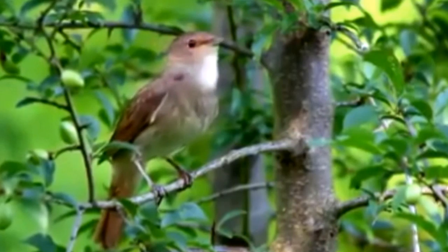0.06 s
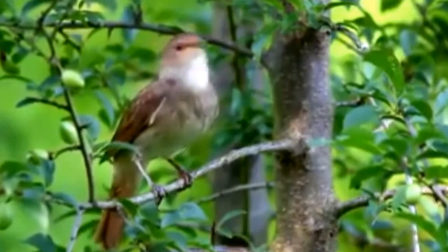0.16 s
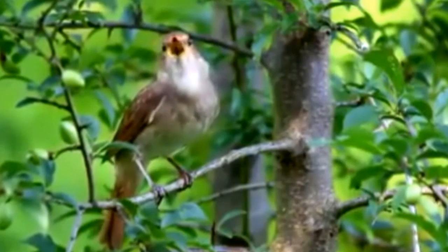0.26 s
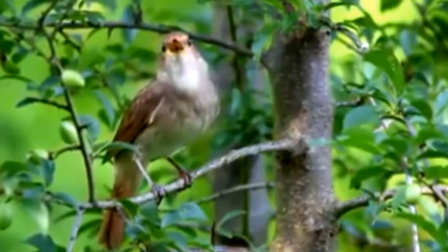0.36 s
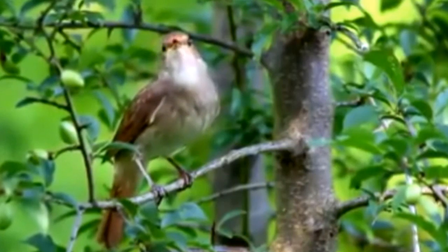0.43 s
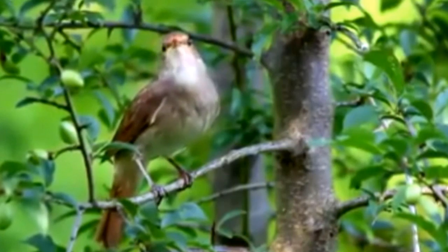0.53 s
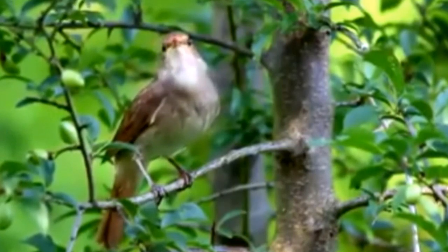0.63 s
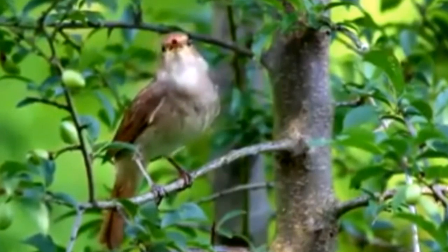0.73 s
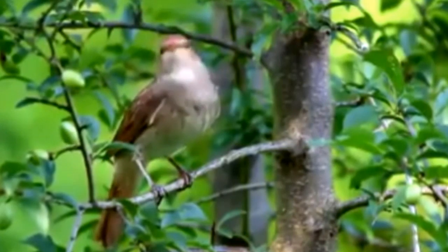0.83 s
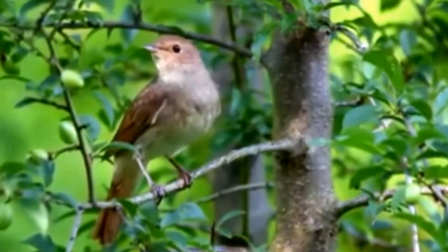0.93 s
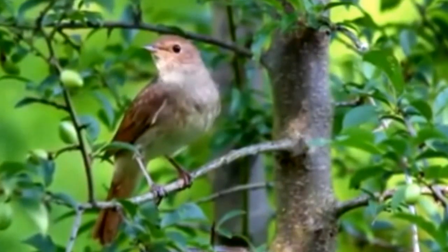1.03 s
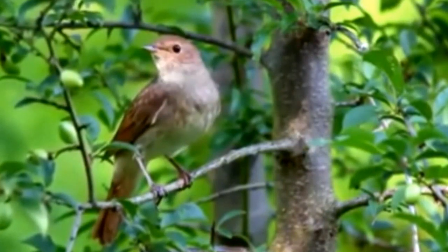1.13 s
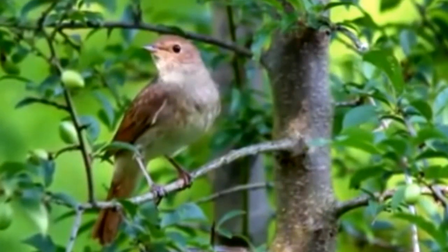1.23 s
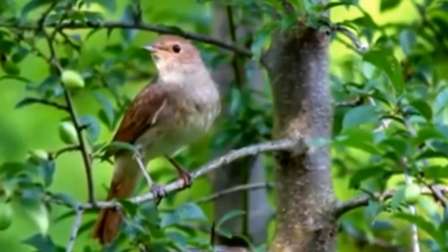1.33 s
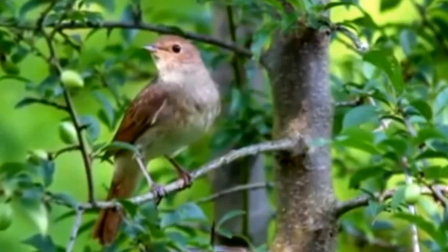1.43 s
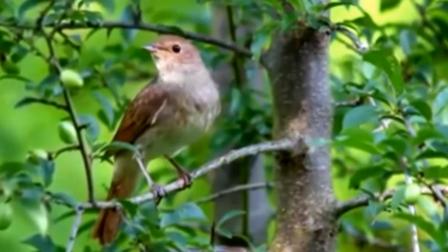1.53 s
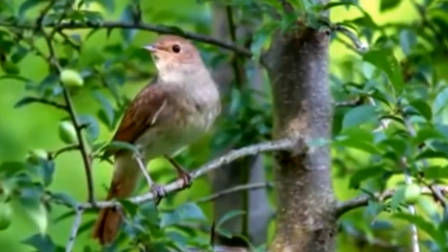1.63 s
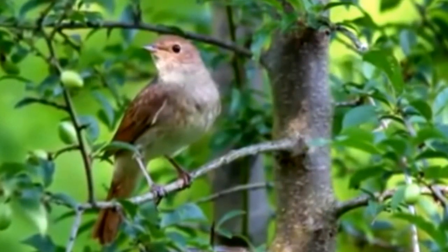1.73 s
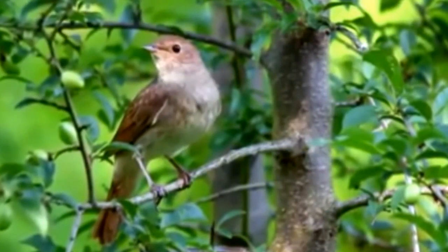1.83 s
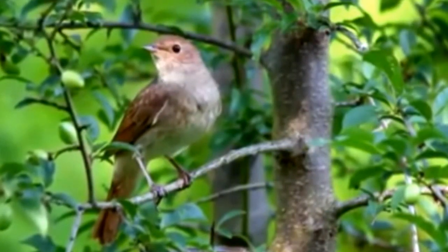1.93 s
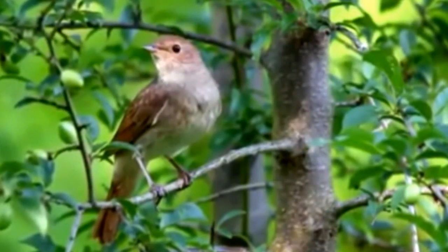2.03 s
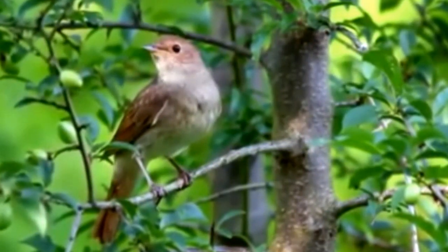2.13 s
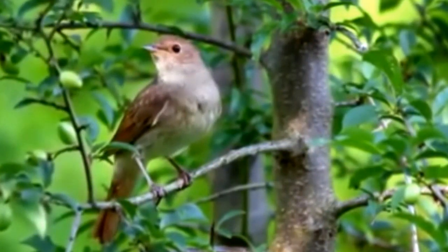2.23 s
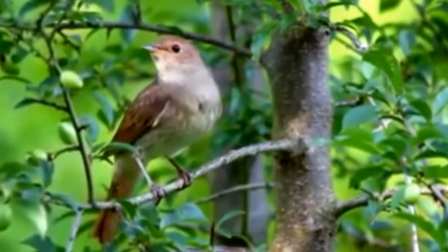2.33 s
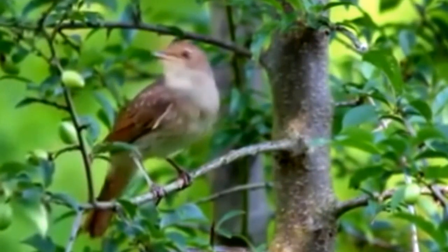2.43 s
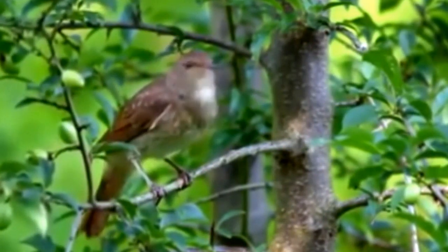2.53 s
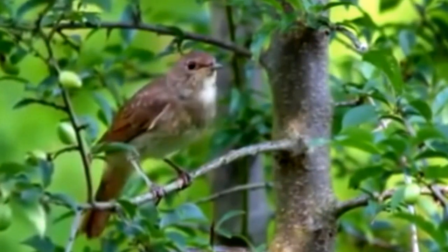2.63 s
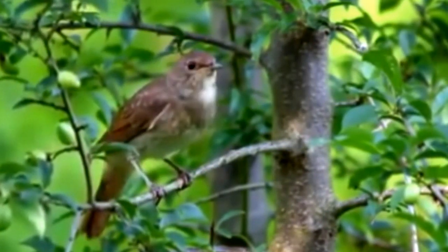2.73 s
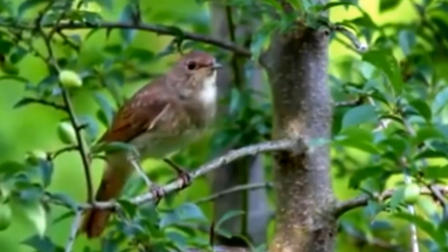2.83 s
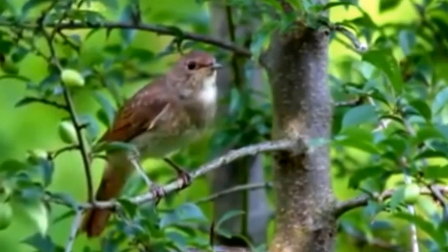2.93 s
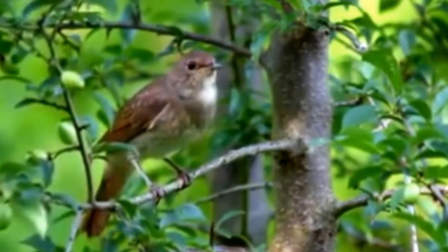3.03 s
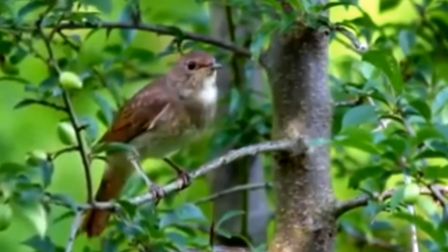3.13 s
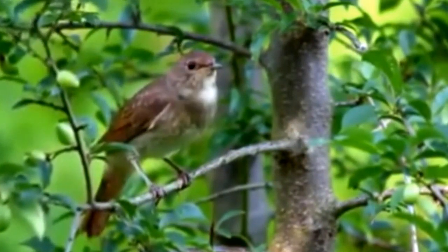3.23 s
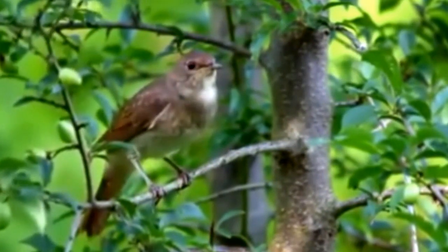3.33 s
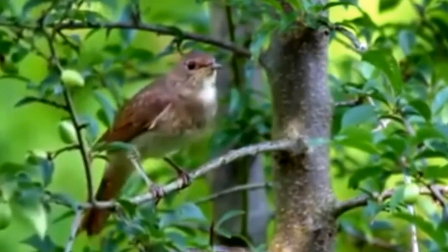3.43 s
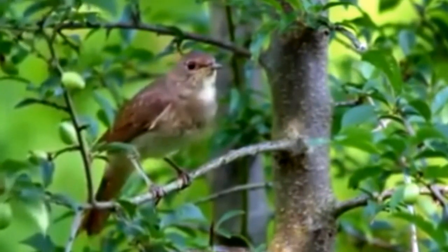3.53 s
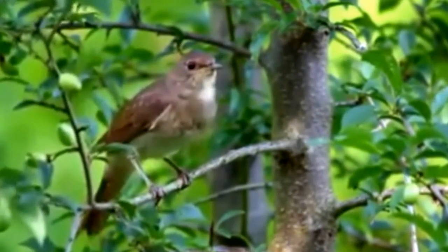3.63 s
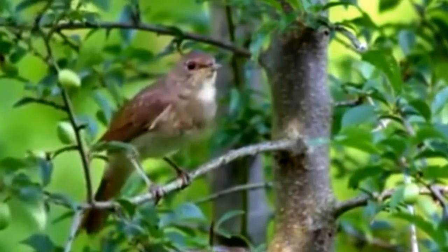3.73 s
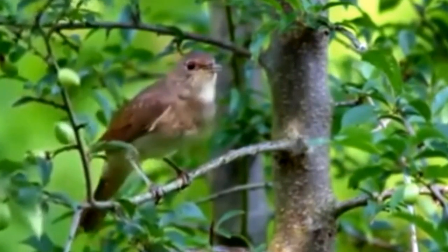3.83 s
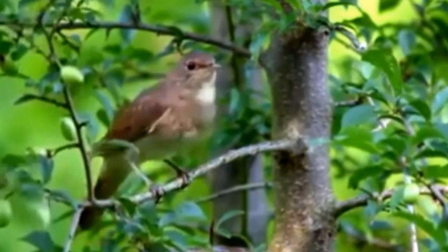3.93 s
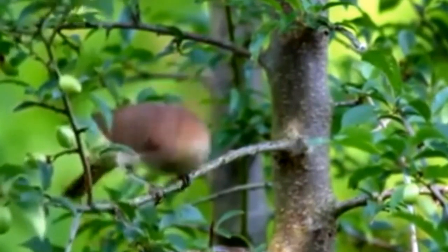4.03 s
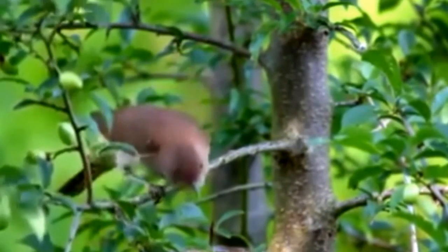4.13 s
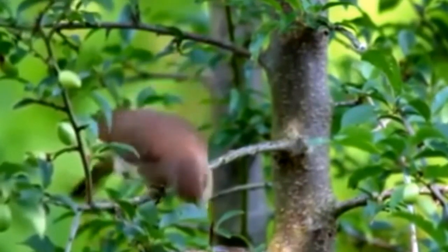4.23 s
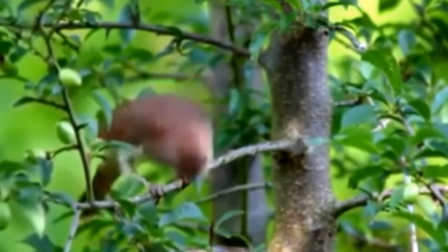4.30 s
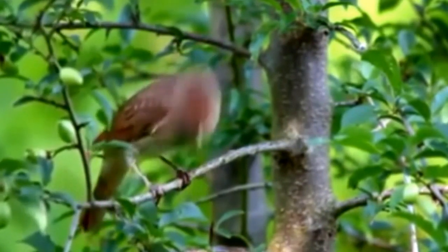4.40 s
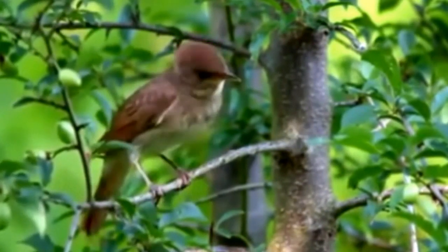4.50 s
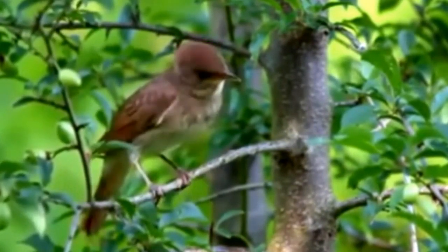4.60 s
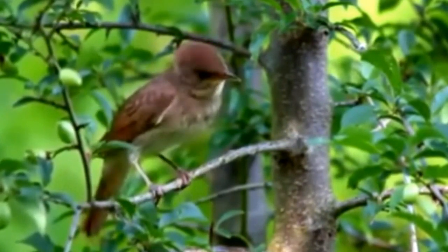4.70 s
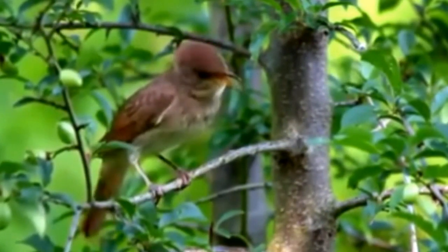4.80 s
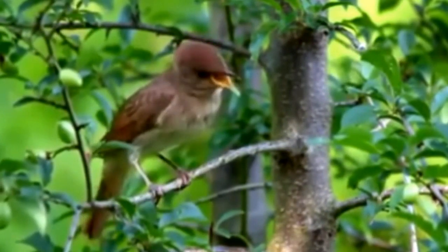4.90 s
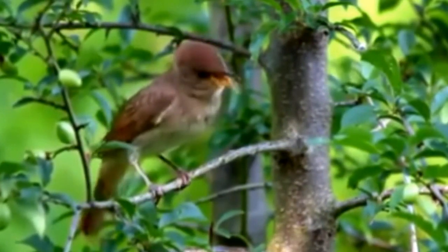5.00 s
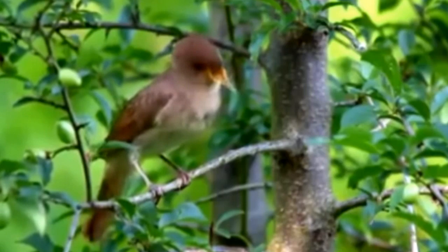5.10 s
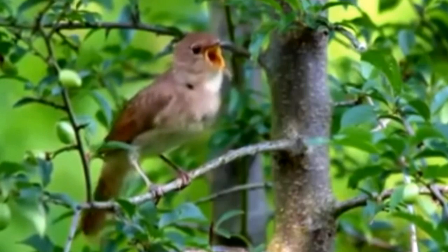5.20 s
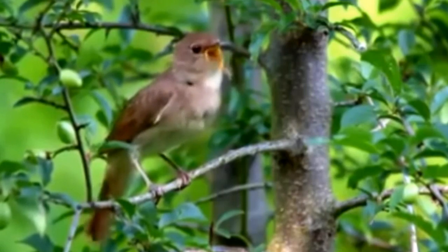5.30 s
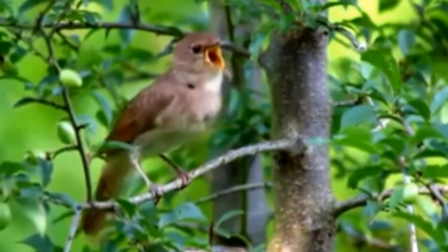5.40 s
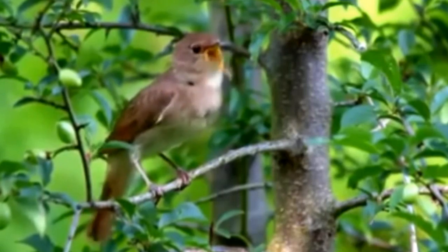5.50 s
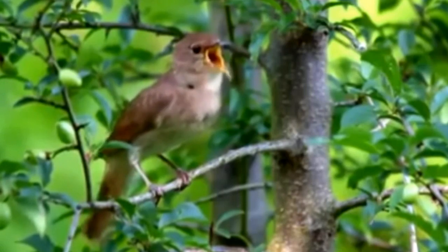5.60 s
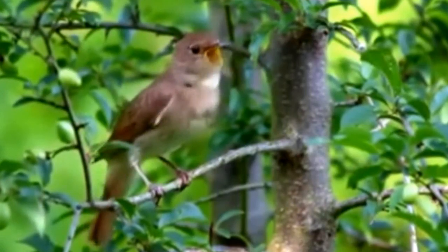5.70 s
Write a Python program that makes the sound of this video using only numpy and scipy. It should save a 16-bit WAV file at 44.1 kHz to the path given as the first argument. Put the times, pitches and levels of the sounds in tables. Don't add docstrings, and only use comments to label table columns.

```python
import sys
import numpy as np
from scipy import signal
from scipy.fft import rfft, irfft, next_fast_len
from scipy.io import wavfile
from scipy.ndimage import uniform_filter1d

SR = 44100
rng = np.random.default_rng(int(sys.argv[2]) if len(sys.argv) > 2 else 0)


def natural_amplitude(level_db):
    exponent = np.asarray(level_db, float) / 20
    return 10 ** exponent


def wav_record(signal):
    frames = np.transpose(np.atleast_2d(signal))
    bounded = np.clip(frames, -1, 1)
    quanta = np.round(bounded * 32767).astype(np.int16)
    wavfile.write(sys.argv[1], SR, quanta)


N = 253575
M = N + SR // 2


def unit(x):
    return x / np.sqrt(np.mean(x ** 2) + 1e-20)


def along(points, hz):
    f, v = np.transpose(points)
    return np.interp(np.log(hz + 1), np.log(f + 1), v)


def filtered(x, response):
    m = next_fast_len(x.shape[-1] + 8192)
    return irfft(rfft(x, m) * response(np.fft.rfftfreq(m, 1 / SR)), m)[..., :x.shape[-1]]


def wander(count, width):
    noise = rng.standard_normal(count)
    return unit(uniform_filter1d(uniform_filter1d(noise, size=width), size=width))


def note(rows, overtones, jitter_hz, flutter_db):
    s, hz, db = np.transpose(rows)
    t = np.arange(round(s[0] * SR), round(s[-1] * SR)) / SR
    shake, flutter = wander(len(t), 100), wander(len(t), 300)
    pitch = uniform_filter1d(np.interp(t, s, hz), size=200) + jitter_hz * shake
    phase = 2 * np.pi * np.cumsum(pitch) / SR
    level_db = np.interp(t, s, db)
    effort_db = level_db - db.max()
    gape = pitch / pitch.max()
    tone = np.sin(phase)
    for k, overtone_db in overtones:
        strength = natural_amplitude(overtone_db + (.4 * k + 1.13) * effort_db) * gape ** (3.7 * k - 3)
        tone = tone + strength * np.sin(k * phase)
    edges = np.clip(np.minimum(t - s[0], s[-1] - t) / 0.001, 0, 1)
    return round(s[0] * SR), np.sqrt(2) * natural_amplitude(level_db + flutter_db * flutter) * edges * tone


def add(out, start, sound, echoes, tails, dull_hz=20000):
    t = np.arange(SR) / SR
    decay = sum(natural_amplitude(db - 60 * t / t60) / np.sqrt(t60 * SR / 14) for db, t60 in tails)
    leaves = filtered(rng.standard_normal(SR), lambda f: 1 / (1 + (f / dull_hz) ** 6))
    answer = leaves * decay * (t > .004)
    answer[0] = 1
    for delay, db in echoes:
        answer += natural_amplitude(db) * np.sinc((t - delay) * SR)
    heard = signal.fftconvolve(sound, answer[::-1])
    first = start - SR + 1
    out[max(first, 0):first + len(heard)] += heard[max(-first, 0):]


# (frequency [Hz], density [dB per Hz])
AIR_SPECTRUM = [(15, -45.5), (25, 3), (104, -5.5), (351, -12), (526, -11.5), (602, -13.5), (1280, -17.5),
                (1720, -19.5), (1970, -19.5), (2440, -17), (3970, -21.5), (12000, -27.5), (15700, -34)]


def air():
    hiss = unit(filtered(rng.standard_normal(M), lambda f: natural_amplitude(along(AIR_SPECTRUM, f))))
    hum = natural_amplitude(-10.0) * np.sin(2 * np.pi * 98 * np.arange(M) / SR)
    return natural_amplitude(-54.5) * (hum + hiss)


# (time [s], level [dB])
TWIG_SNAPS = [
    (3.495, -32),
    (4.906, -50),
]


def twigs():
    out, t = np.zeros(M), np.arange(-200, 200) / SR
    color = [(1000, -14), (4200, -19), (4600, 1.0), (5000, -9), (11000, -7.5), (15000, -27.5)]  # Hz, dB
    for s, db in TWIG_SNAPS:
        burst = rng.standard_normal(400) * np.exp(-(t / 0.0023) ** 2)
        out[round(s * SR) - 200:][:400] = natural_amplitude(db) * burst
    return filtered(out, lambda f: natural_amplitude(along(color, f)))


def piped_shape(start, length, hz, db):
    edge_s, edge_db = .015, 12
    u = np.arange(21) / 20
    edge = np.clip(1 - np.minimum(u, 1 - u) * length / edge_s, 0, 1)
    return np.transpose([start + u * length, hz(u), db - edge_db * edge])


# (start [s], length [s], first pitch [Hz], last pitch [Hz], level [dB])
FAR_GLIDES = [(.09, .11, 2176, 2253, -47.5), (.92, 0.092, 2137, 2190, -55), (1.11, 0.11, 2170, 2270, -54.5),
              (1.199, .04, 2256, 1794, -59), (2.26, 0.116, 2128, 2334, -61), (3.6, 0.077, 2023, 2050, -63),
              (3.704, 0.071, 1968, 2067, -56.5), (3.769, 0.086, 2000, 1932, -51),
              (3.865, 0.133, 1970, 1974, -61.5), (4.218, .06, 1993, 2050, -71),
              (4.315, .08, 2020, 2147, -62.5), (4.48, .08, 2080, 2163, -63.5),
              (4.76, 0.128, 2150, 2187, -60.5), (4.97, .06, 2207, 2080, -58), (5.15, .07, 1980, 2290, -54),
              (5.256, 0.1, 2088, 2030, -57), (5.479, .06, 1890, 1850, -52),
              (5.56, 0.093, 1912, 1903, -55.5), (3.45, 0.054, 1790, 1795, -56.5),
              (2.24, .1, 2020, 2200, -69), (2.299, .07, 2300, 2520, -60.5), (4.8, .12, 1980, 2010, -68),
              (5.053, .08, 2130, 2060, -56), (5.26, 0.08, 1850, 1800, -66)]
# (start [s], length [s], first pitch [Hz], last pitch [Hz], level [dB])
FAR_HIGH = [
    (.25, .07, 5850, 5940, -68),
    (.55, .07, 5600, 5844, -72),
    (4.15, 0.09, 5900, 5980, -72),
    (4.3, .07, 5950, 6150, -71),
    (4.41, 0.1, 6290, 6300, -67),
    (4.54, 0.12, 5600, 5550, -68),
]


def far_glides():
    out = np.zeros(M)
    for s, length, first_hz, last_hz, db in FAR_GLIDES + FAR_HIGH:
        rows = piped_shape(s, length, lambda u: first_hz + (last_hz - first_hz) * u, db)
        tone = note(rows, [], jitter_hz=60, flutter_db=3.5)
        add(out, *tone, [(.017, -9.5), (.029, -4.5)], [(-8.0, .25), (-2.5, 3.1)])
    return out


# (start [s], length [s], end pitch [Hz], middle pitch [Hz], level [dB])
FAR_ARCHES = [
    (2.575, .14, 2550, 3090, -50),
    (3.298, 0.137, 2530, 2400, -49.5),
    (3.49, .12, 1783, 2159, -49.5),
    (4.56, .155, 5540, 5790, -65),
]


def far_arches():
    out = np.zeros(M)
    late, roundness = 1.2, 1.5
    for s, length, end_hz, mid_hz, db in FAR_ARCHES:
        def arch(u):
            return mid_hz + (end_hz - mid_hz) * abs(2 * u ** late - 1) ** roundness
        tone = note(piped_shape(s, length, arch, db), [], jitter_hz=25, flutter_db=5.0)
        add(out, *tone, [(.021, -17), (.034, -25)], [(-6.5, 0.23), (-7.0, 2.9)])
    return out


# (middle [s], level [dB], half length [s])
CHUCKS = [
    (3.786, -50.5, 0.017),
    (4.416, -49, 0.014),
    (4.896, -50, 0.019),
]
# (center [Hz], width [Hz], level [dB])
THROAT = [(1600, 200, -6), (2480, 300, 0), (2880, 250, -3.5), (4400, 320, -3.5)]


def chucks():
    out, t = np.zeros(M), np.arange(-2000, 2000) / SR

    def throat(f):
        return sum(natural_amplitude(db) * 1j * f * w / (c * c - f * f + 1j * f * w) for c, w, db in THROAT)

    def color(f):
        return throat(f) ** 2 + 0.26 * (f > 1500) * (f < 5200)

    for s, db, half in CHUCKS:
        rasp = unit(filtered(rng.standard_normal(len(t)), color)) * np.exp(-(t / half) ** 4)
        add(out, round(s * SR) - 2000, natural_amplitude(db) * rasp, [], [(-4.0, 0.24)])
    return out


def ducking():
    dip_s, dip_db, attack_s, release_s = 5.1, 6, .2, .9
    times = [dip_s - attack_s, dip_s, dip_s + release_s]
    return natural_amplitude(np.interp(np.arange(M) / SR, times, [0, -dip_db, 0]))


def splashes():
    t = np.arange(M) / SR
    late_s, half_width_s, under_db = 0.018, .012, -39
    size = np.zeros(M)
    for s, _, db, *_ in WHISTLES:
        size += natural_amplitude(db + under_db) * np.exp(-((t - s - late_s) / half_width_s) ** 4)
    return size * unit(filtered(rng.standard_normal(M), lambda f: (f > 200) / (1 + (f / 3000) ** 2)))


def pips():
    out, t = np.zeros(M), np.arange(-600, 600) / SR
    late_s, under_db, pitch_hz = .015, -33, 3250

    def color(f):
        return (f > pitch_hz - 400) / (1 + ((f - pitch_hz) / 1200) ** 2)

    for s, db in RATTLE[2::3]:
        breath = unit(filtered(rng.standard_normal(len(t)), color)) * np.exp(-(t / .006) ** 4)
        out[round((s + late_s) * SR) - 600:][:1200] += natural_amplitude(db + under_db) * breath
    return out


# (middle [s], peak level [dB])
RATTLE = [(5.033, -11.5), (5.0734, -13), (5.1132, -14), (5.2304, -12), (5.272, -13), (5.3098, -14.5),
          (5.4214, -12.5), (5.4638, -11), (5.5012, -11), (5.6205, -12), (5.6619, -12), (5.6988, -9.5),
          (5.815, -7.5), (5.856, -12)]
# (frequency [Hz], level [dB])
RATTLE_COLOR = [(500, -26.5), (1500, -15.5), (2400, -13), (3200, -5.5), (4500, -3), (5600, 0.5), (7200, -1.5),
                (8200, -17), (9800, -1), (10600, -7), (12500, 1), (14500, -1.5), (16000, -28.5)]
# (delay [s], level [dB])
RATTLE_ECHOES = [(.00175, -5), (.00265, -8), (.0046, -13), (.0112, -19), (.0157, -20)]


def rattle():
    out = np.zeros(M)
    t = np.arange(-300, 300) / SR
    for (s, db), vary in zip(RATTLE, rng.standard_normal((len(RATTLE), 8))):
        octave_s = .0028 + .0002 * vary[2]
        hz = 4900 * (1 + .04 * vary[0]) * 2 ** (t / octave_s)
        phase = 2 * np.pi * np.cumsum(hz) / SR + 3 * vary[1]
        octave = 0.97 * np.sin(2 * phase) * (hz < 9000)
        puff = 0.26 * rng.standard_normal(len(t))
        click = natural_amplitude(db) * (np.sin(phase) + octave + puff) * np.exp(-(t / .0017) ** 4)
        echoes = [(delay * (1 + 0.035 * v), level + 3.5 * v)
                  for (delay, level), v in zip(RATTLE_ECHOES, vary[3:])]
        add(out, round((s + .0006) * SR) - 300, click, echoes, [(-7.5, 0.16), (-20.5, .7)])
    return filtered(out, lambda f: natural_amplitude(along(RATTLE_COLOR, f)))


def whistle_shape(start, length, db, top_hz, glide_s, sag_db, release_s, drift_hz, push_s, push_hz):
    low_hz, foot_s = 2530, .003
    knee_share, knee_hz = .66, 213.7
    flick_hz, flick_s, push_half_s = 122, .016, .04
    attack_s, attack_db, top_share, fade_power = 0.0065, 30, .15, 1.25
    knee, up = attack_s + knee_share * glide_s, attack_s + glide_s
    t = np.arange(0, length, 1 / 1000)
    hz = np.interp(t, [attack_s + foot_s, knee, up, length - flick_s, length],
                   [low_hz, top_hz - knee_hz, top_hz, top_hz, top_hz + flick_hz])
    drift = drift_hz * np.clip(t - up, 0, 1)
    push = push_hz * np.clip(1 - abs(t - push_s) / push_half_s, 0, 1)
    level = np.interp(t, [0, attack_s, knee, up, length], [-attack_db, 0, 0, -top_share * sag_db, -sag_db])
    fade = 20 * fade_power * np.log10(np.clip((length - t) / release_s, 1 / 50, 1))
    return np.transpose([start + t, hz + drift + push, db + level + fade])


# (start [s], length [s], level [dB], held pitch [Hz], glide [s])
WHISTLES = [
    (.034, .188, -11.5, 3205, .039),
    (.458, .19, -12.5, 3320, .039),
    (.883, .174, -18, 3360, .036),
]
# (sag by the end [dB], release [s], drift [Hz/s], push after start [s], push [Hz])
EFFORT = [
    (6, 0.06, 400, .142, 95),
    (15, 0.033, -150, 0.092, 84),
    (20, .075, 699.5, 0.053, 11),
]
# (multiple [1], level at the top of the glide [dB])
OVERTONES = [
    [(2, -34), (3, -18.5)],
    [(2, -31), (3, -31.5)],
    [(2, -32.5), (3, -49)],
]
# (delay [s], level [dB])
WHISTLE_ECHOES = [(.00343, -8), (0.0126, -12), (0.02, -25.5)]


def whistles():
    out = np.zeros(M)
    for row, effort, overtones in zip(WHISTLES, EFFORT, OVERTONES):
        tone = note(whistle_shape(*row, *effort), overtones, jitter_hz=7, flutter_db=.5)
        add(out, *tone, WHISTLE_ECHOES, [(-17, 0.16), (-22, .8)], dull_hz=3170)
    return out


def scene():
    background = air() + twigs() + far_glides() + far_arches() + chucks()
    near = pips() + splashes() + rattle() + whistles()
    return np.tile((near + ducking() * background)[:N], (2, 1))


def smoothed_power(z, bins, frames):
    power = uniform_filter1d(abs(z) ** 2, size=bins, axis=0)
    return abs(uniform_filter1d(power, size=frames, axis=1))


def block(hz, t, start, end, low, high):
    return ((hz > low) & (hz < high))[:, None] & (t >= start) & (t < end)


# (frequency [Hz], level [dB])
GRAIN = [(200, -67), (1900, -64.5), (2050, -49.5), (2900, -41.5), (3600, -26), (3950, -45.5), (4100, -62),
         (8000, -63), (9000, -81.5)]


def grainy(x):
    true, grain = signal.stft([x, rng.standard_normal(N)], SR, nperseg=512)[2]
    hz = np.fft.rfftfreq(512, 1 / SR)
    song = smoothed_power(true, 1, 3)[(hz > 2000) & (hz < 4100)].sum(0)
    under_song = natural_amplitude(along(GRAIN, hz))[:, None] ** 2 * song
    under_treble = natural_amplitude(-53.5) * smoothed_power(true, 25, 5) * (hz > 4650)[:, None]
    halo = np.sqrt(under_song + under_treble)
    grain = grain / np.sqrt(np.mean(abs(grain) ** 2))
    return x + signal.istft(halo * grain, SR, nperseg=512)[1][:N]


# (from [lengths], to [lengths], low [Hz], high [Hz], level [dB])
STARVED = [
    (-.6, .2, 11600, 16000, -10),
    (.15, 1.1, 11600, 16000, -25),
    (-.3, .13, 8200, 9600, -18),
]
# (low [Hz], high [Hz], tone louder than [dB])
MASKED = [(4050, 4700, -25), (4700, 5450, -15.5), (7000, 7900, -14.5)]
# (start [s], length [s], above [Hz], level [dB])
LOST_TREBLE = [
    (2.62, .04, 11600, -8),
    (3.13, .165, 8000, -40),
    (5.35, .082, 8300, -32),
]


def starve(mid, hz, t):
    for s, length, *_ in WHISTLES:
        for a, b, low, high, db in STARVED:
            mid[block(hz, t, s + a * length, s + b * length, low, high)] *= natural_amplitude(db)
    for row, effort in zip(WHISTLES, EFFORT):
        s, pitch, db = whistle_shape(*row, *effort).T
        for low, high, over_db in MASKED:
            loud = s[(pitch >= row[3] - 60) & (db > over_db)]
            mid[block(hz, t, loud.min(initial=N), loud.max(initial=0), low, high)] *= natural_amplitude(-28)
    for s, length, low, db in LOST_TREBLE:
        mid[block(hz, t, s, s + length, low, SR)] *= natural_amplitude(db)


# (start [s], length [s], above [Hz], level under the sum [dB])
RATTLE_APART = [
    (5.02, .11, 9900, -27),
    (5.427, .03, 4200, -22),
    (5.575, .068, 4200, -14),
]


def difference(mid, grain, hz, t):
    chance = rng.random((len(hz) // 4 + 1, len(t) // 16 + 1)) < .03
    patches = np.kron(chance, np.ones((4, 16)))[:len(hz), :len(t)]
    apart = natural_amplitude(-14.5) * patches * ((hz > 2000) & (hz < 14000))[:, None]
    for s, length, *_ in WHISTLES:
        end = s + .7 * length
        apart[block(hz, t, s, end, 2300, 4000)] = natural_amplitude(-26.5)
        apart[block(hz, t, s, end, 9400, 11400)] = natural_amplitude(-12)
    for s, length, low, db in RATTLE_APART:
        apart[block(hz, t, s, s + length, low, SR)] = natural_amplitude(db)
    return apart * (abs(mid) * grain[::-1] - 0.36 * mid)


def replicated_treble(x):
    shift_hz, split_hz = 22 * SR / 128, 7950
    x = grainy(x)
    carrier = np.exp(2j * np.pi * shift_hz * np.arange(N) / SR)
    copy = (signal.hilbert(x, next_fast_len(N))[:N] * carrier).real
    hz, t, (true, moved, grain) = signal.stft([x, copy, rng.standard_normal(N)], SR, nperseg=256)
    grain /= np.sqrt(np.mean(abs(grain) ** 2))
    moved += .5 * grain * np.sqrt(smoothed_power(moved, 9, 3))
    leak = natural_amplitude(-78)
    moved *= np.sqrt(smoothed_power(true, 11, 3) / (smoothed_power(moved, 6, 3) + 1e-20) + leak)
    mid = np.where((hz > split_hz)[:, None], moved, true)
    starve(mid, hz, t)
    side = difference(mid, grain, hz, t)
    return signal.istft([mid + side, mid - side], SR, nperseg=256)[1][:, :N]


def roll_off(x):
    return signal.sosfilt(signal.butter(12, 15850, fs=SR, output="sos"), x)


def record(dry):
    heard = filtered(dry.mean(0), lambda f: f ** 4 / (f ** 4 + 47 ** 4))
    mix = filtered(replicated_treble(heard), lambda f: f < 15750)
    return roll_off(mix)


dry = scene()
out = record(dry)
wav_record(out)
```